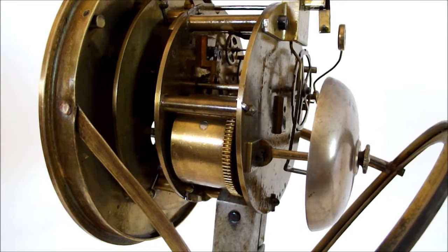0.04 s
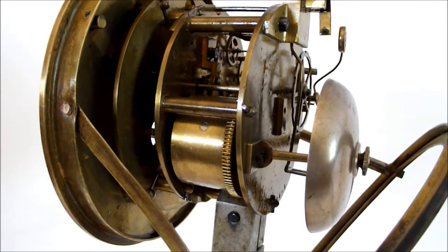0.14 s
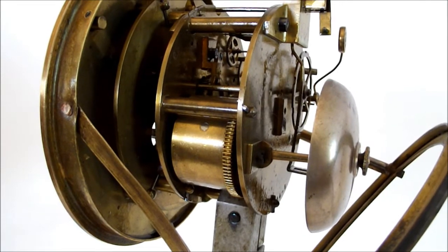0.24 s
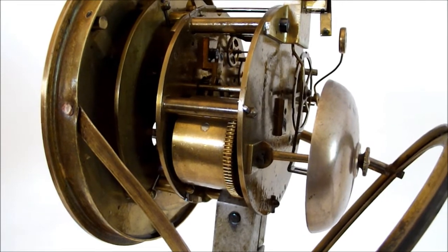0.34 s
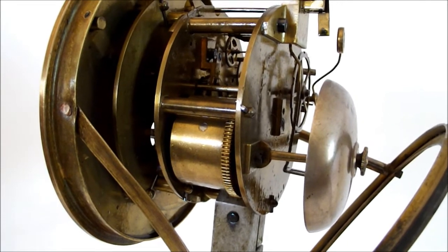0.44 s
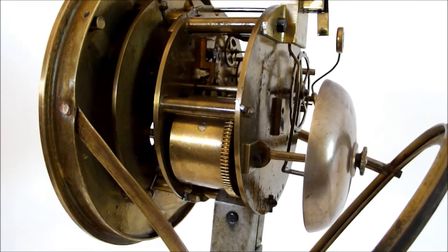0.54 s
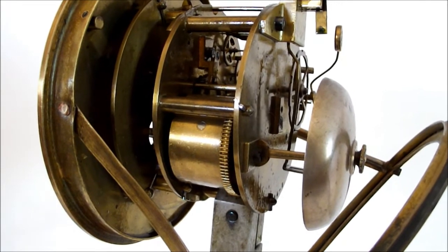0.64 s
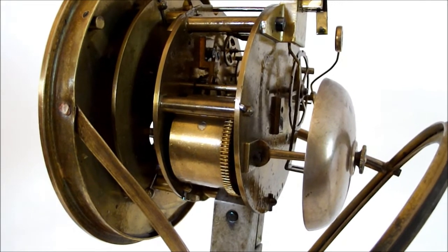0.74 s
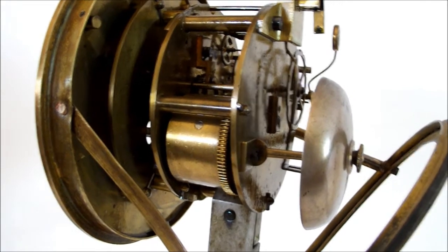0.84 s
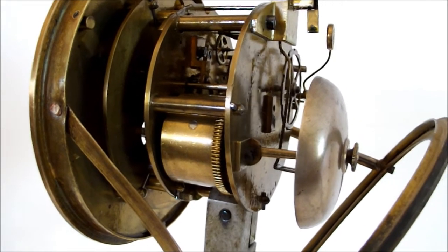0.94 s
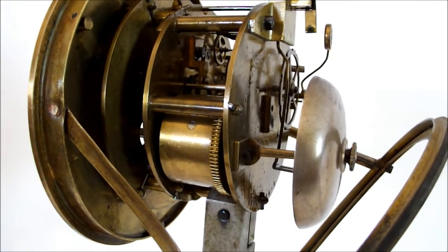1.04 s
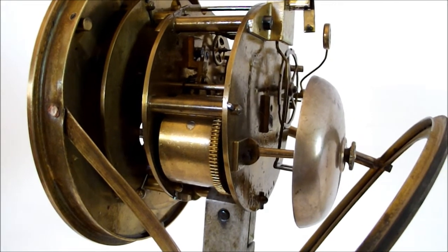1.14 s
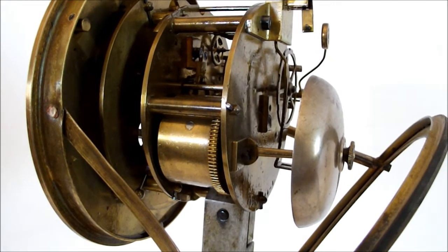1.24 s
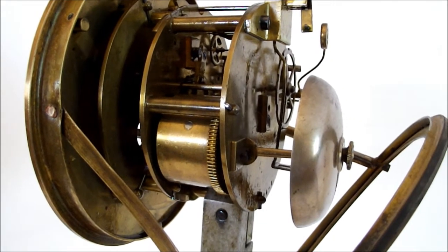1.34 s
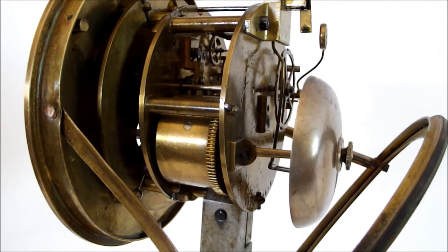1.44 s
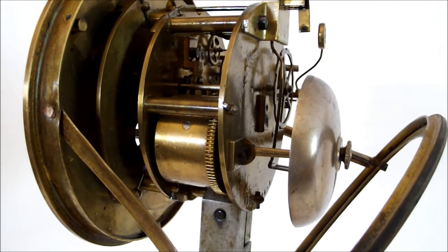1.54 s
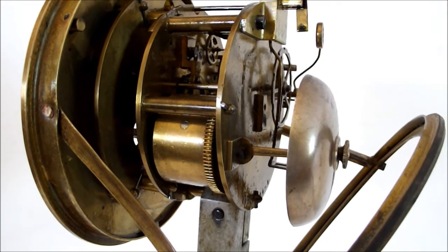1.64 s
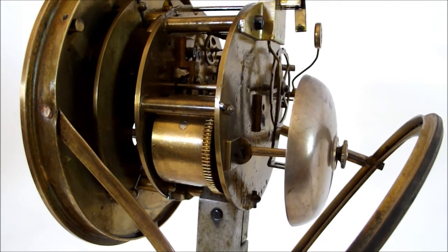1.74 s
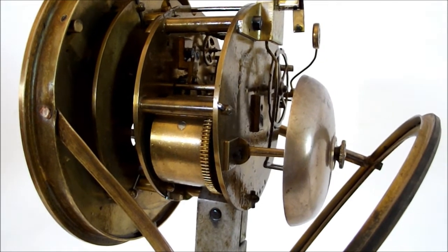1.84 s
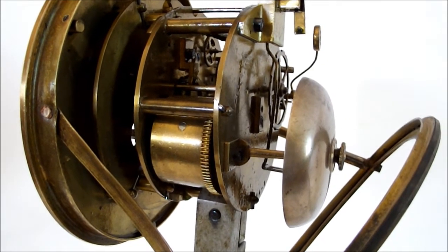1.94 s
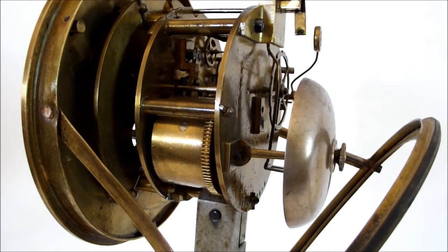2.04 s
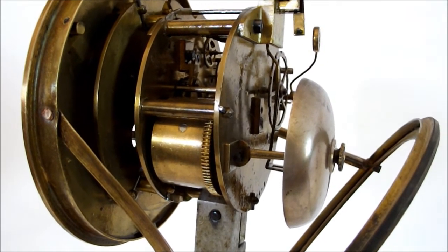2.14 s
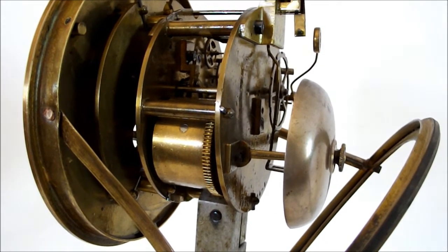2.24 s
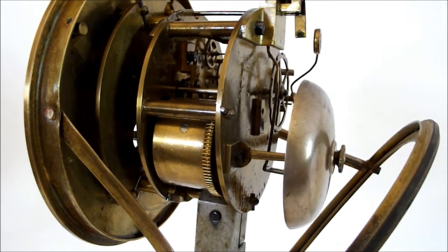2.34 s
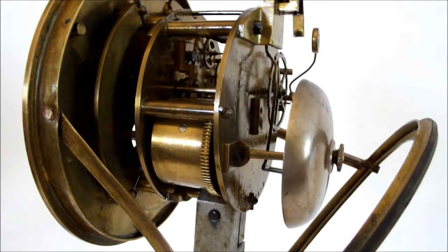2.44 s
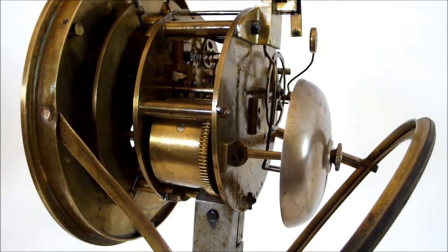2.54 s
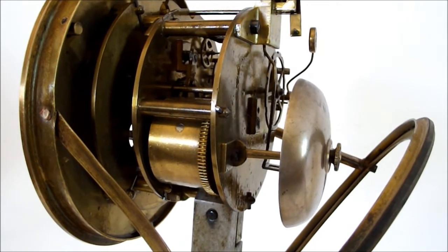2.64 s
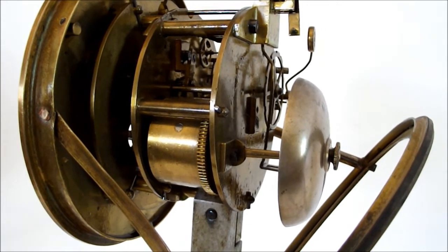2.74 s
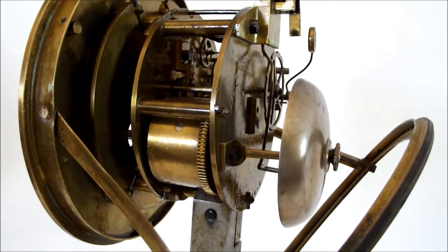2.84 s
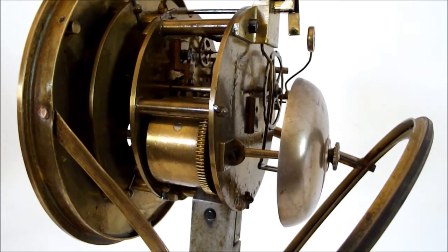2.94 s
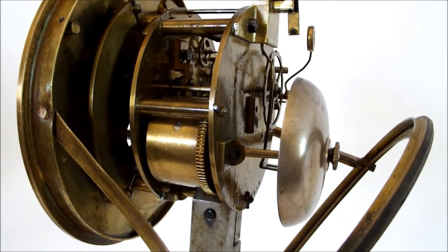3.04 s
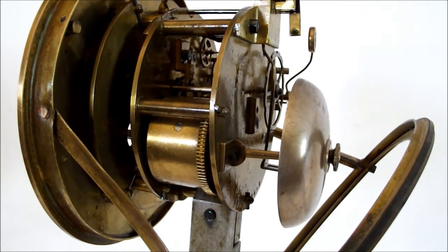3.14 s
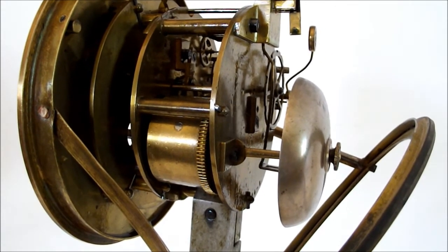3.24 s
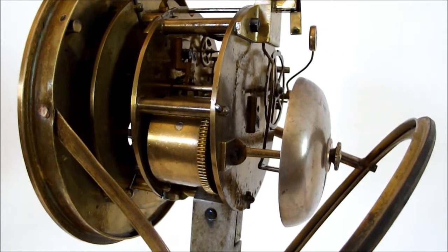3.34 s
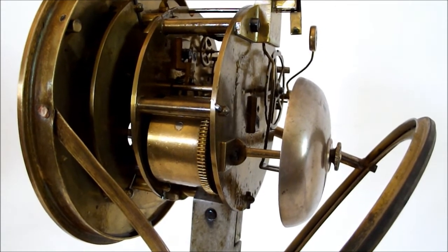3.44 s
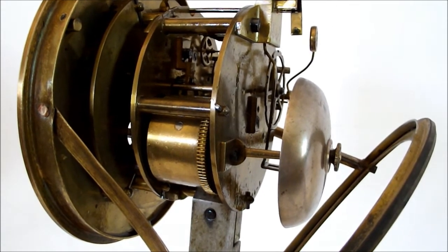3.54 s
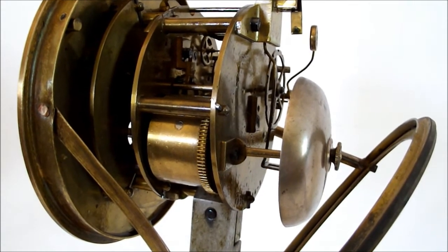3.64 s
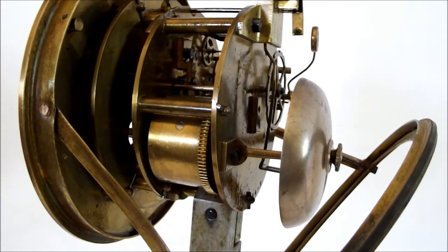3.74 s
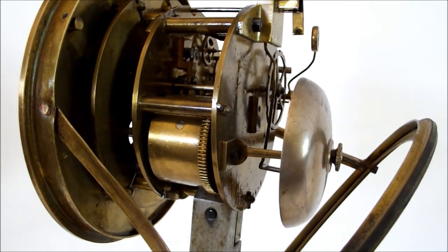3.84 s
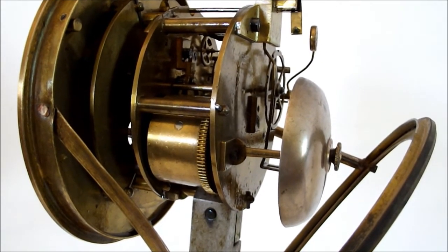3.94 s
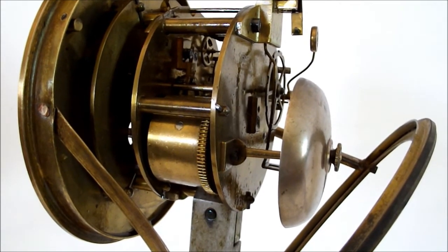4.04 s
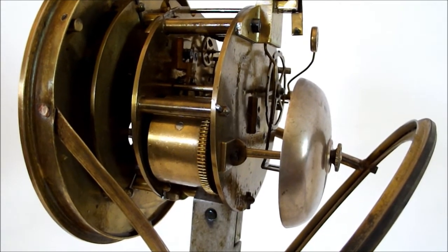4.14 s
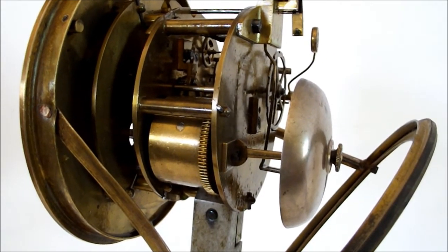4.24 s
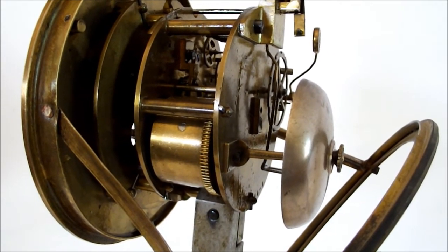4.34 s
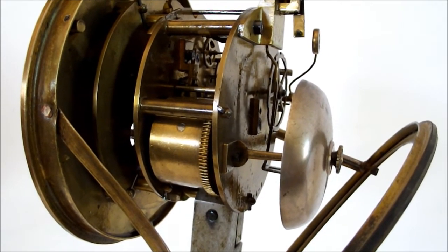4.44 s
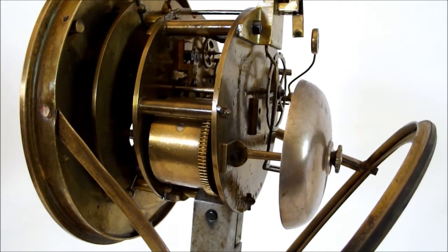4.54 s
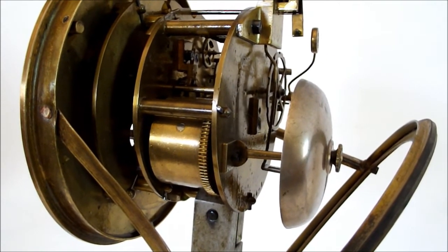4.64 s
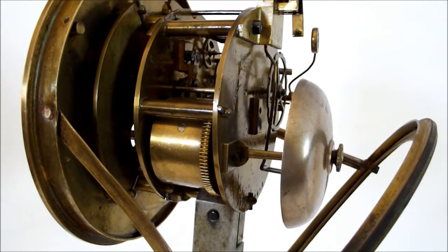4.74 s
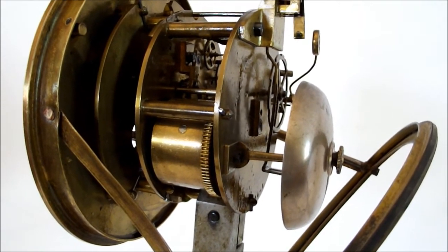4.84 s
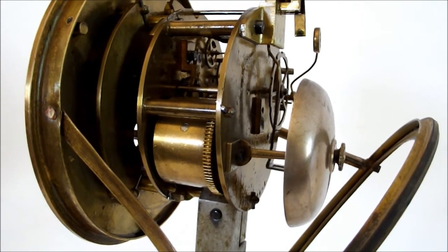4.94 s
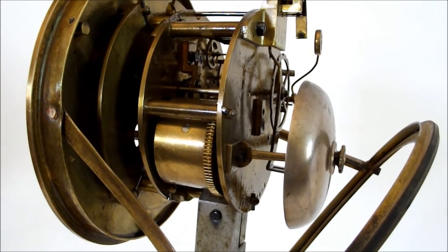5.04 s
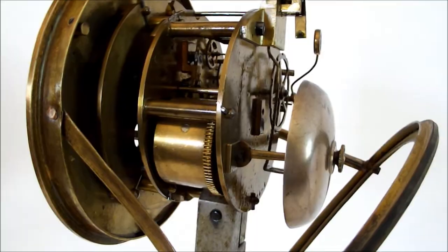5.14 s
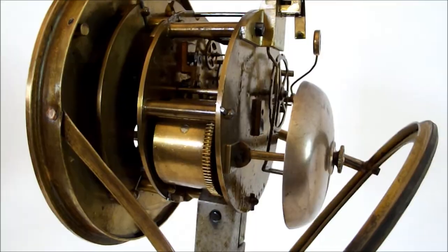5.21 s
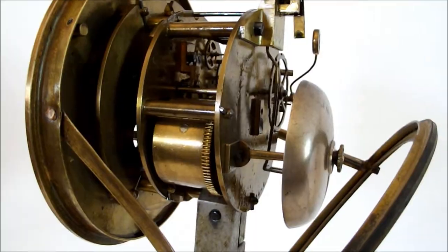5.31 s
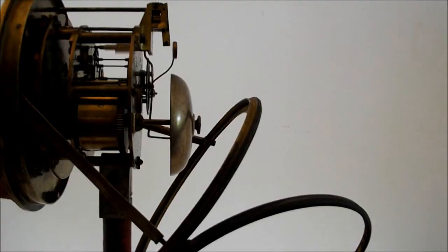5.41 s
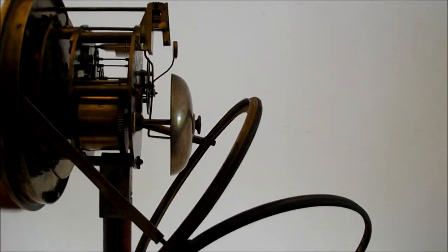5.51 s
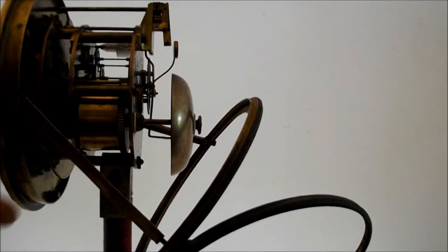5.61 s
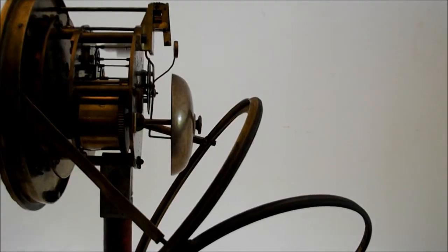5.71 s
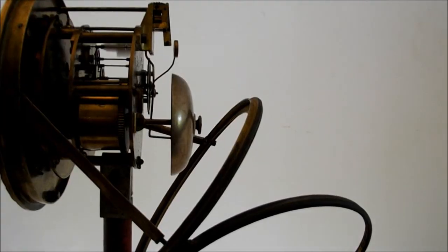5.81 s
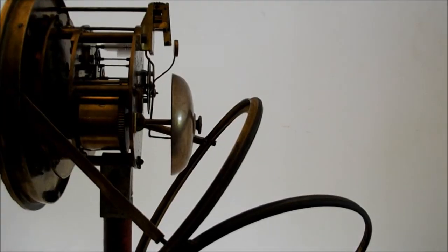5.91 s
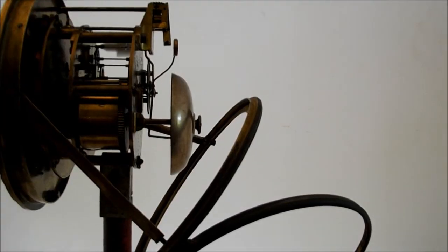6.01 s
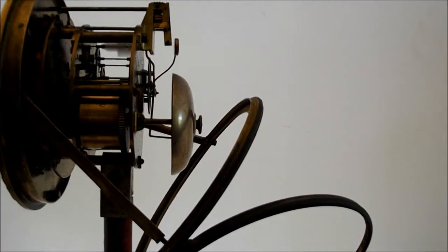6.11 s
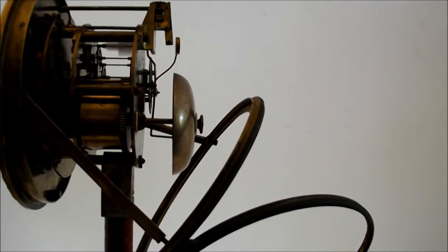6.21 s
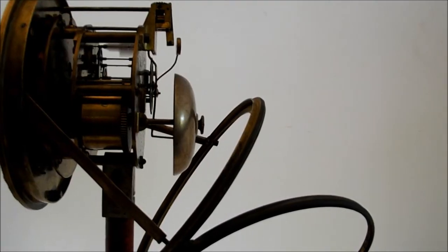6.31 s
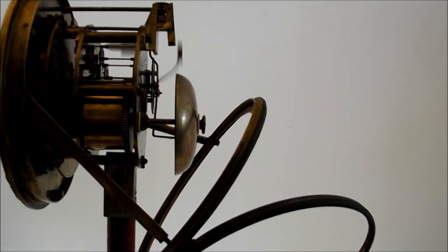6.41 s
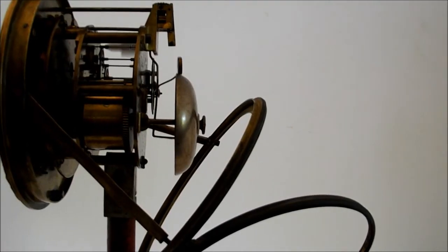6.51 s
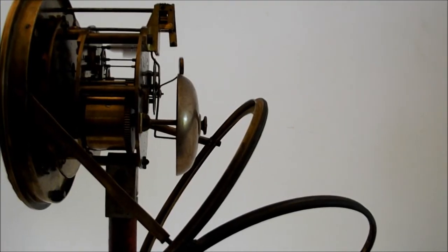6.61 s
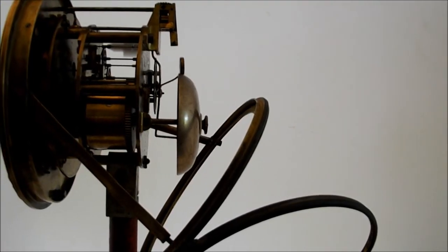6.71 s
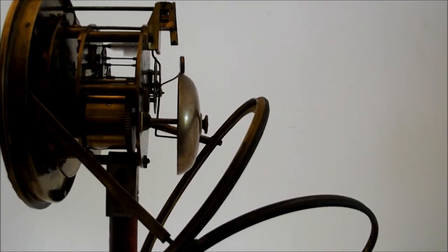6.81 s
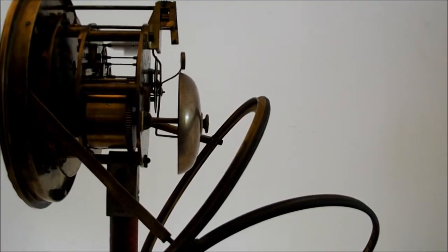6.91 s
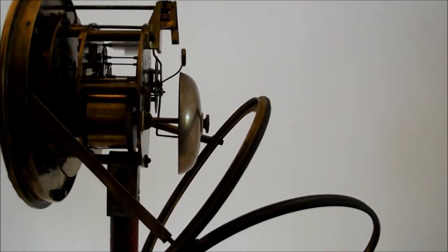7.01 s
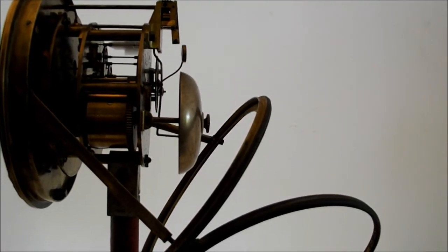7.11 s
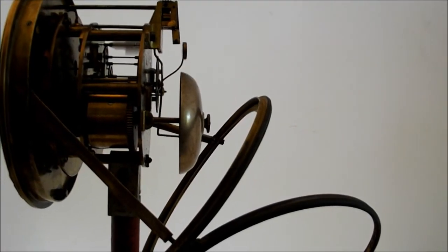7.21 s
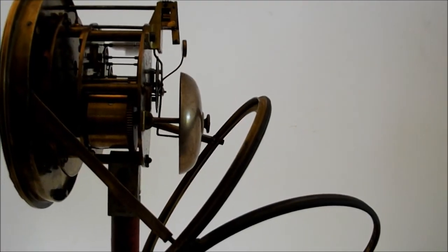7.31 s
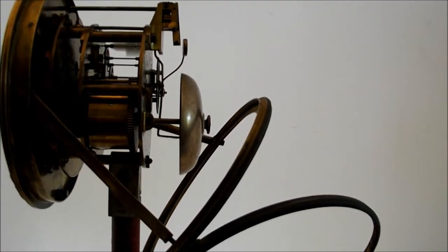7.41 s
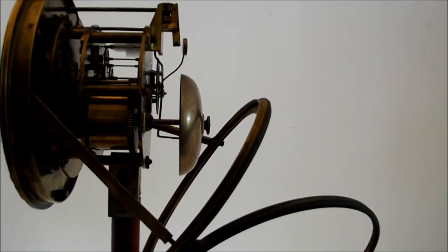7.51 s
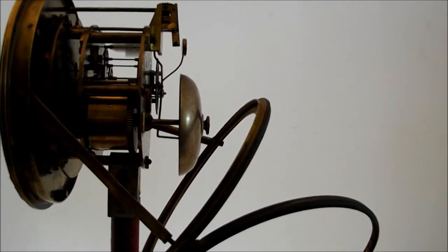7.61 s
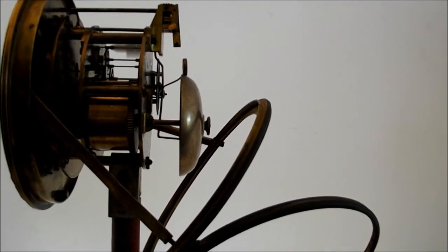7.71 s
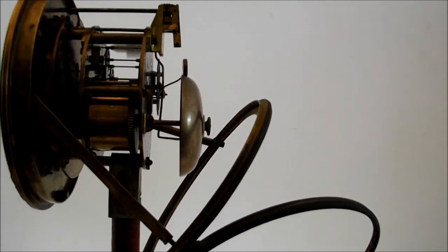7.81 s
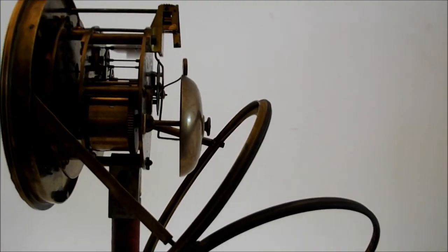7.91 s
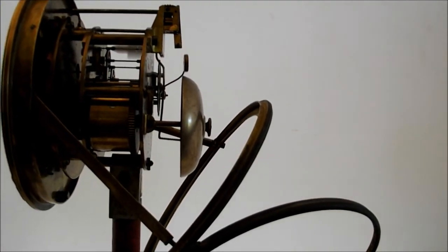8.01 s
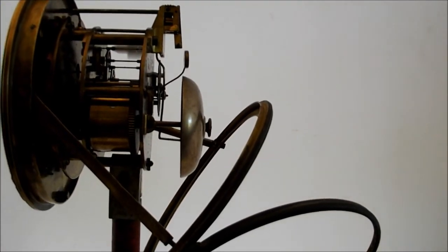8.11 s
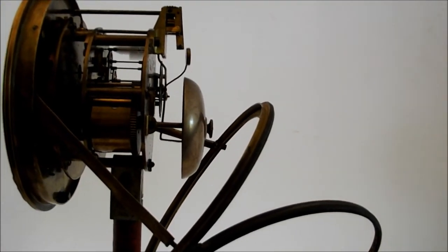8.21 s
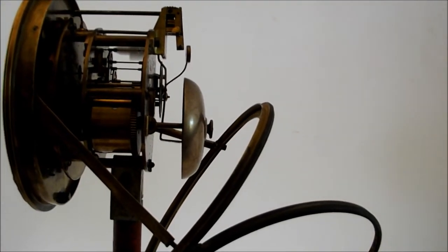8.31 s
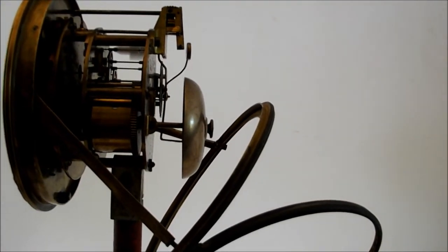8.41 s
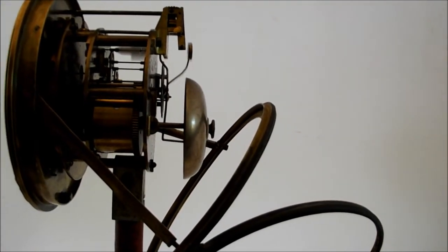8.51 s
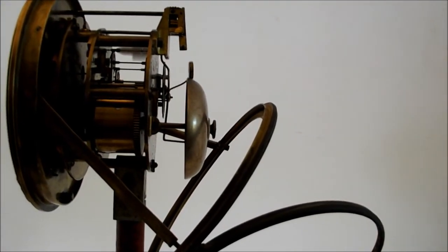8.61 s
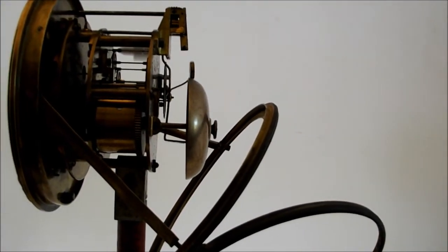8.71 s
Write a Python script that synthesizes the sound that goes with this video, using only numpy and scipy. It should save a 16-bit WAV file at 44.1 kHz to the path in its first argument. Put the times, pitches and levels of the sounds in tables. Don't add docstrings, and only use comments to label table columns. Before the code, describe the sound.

A bare brass clock movement ticks and whirs close up, two wooden knocks among the ticks, then its hammer strikes a bright little bell three times.

```python
import sys
import numpy as np
from scipy import signal
from scipy.fft import rfft, irfft, next_fast_len
from scipy.io import wavfile
from scipy.ndimage import uniform_filter1d, minimum_filter1d

SR = 44100
rng = np.random.default_rng(int(sys.argv[2]) if len(sys.argv) > 2 else 0)


def amplitude_ratio(level_db):
    exponent = np.asarray(level_db, float) / 20
    return 10 ** exponent


def file_out(sig):
    cols = np.atleast_2d(sig).T
    lim = np.clip(cols, -1, 1)
    pcm = np.round(lim * 32767).astype(np.int16)
    wavfile.write(sys.argv[1], SR, pcm)


N = 386306
T = np.arange(N) / SR

# (time [s], level [dB])
TOUCHES = [(6.392499, -10), (6.423977, -22), (6.457216, -21.3), (6.494145, -32.6), (6.529529, -20),
           (6.56739, -17.3), (6.606417, -18.7), (6.639602, -24.2), (7.604261, -10.1), (7.674721, -18.5),
           (7.708237, -19), (8.509644, -10), (8.541736, -23.2), (8.575868, -24.9), (8.610976, -17.5),
           (8.648936, -15.4), (8.68296, -17.5), (8.7583, -24)]
# (frequency [Hz], level [dB])
SNAP = [(1500, -11.5), (2500, -1), (3500, 3), (4800, -9.5), (5500, -27), (7000, -7.5), (9500, -10),
        (12000, -28), (15000, -43.5)]


def evened(x):
    return x / np.sqrt(np.mean(x ** 2) + 1e-20)


def curve(rows, column=1):
    rows = np.asarray(rows)
    return np.interp(T, rows[:, 0], rows[:, column])


def coloured(x, points):
    size = next_fast_len(len(x))
    hz = np.fft.rfftfreq(size, 1 / SR)
    f, db = np.transpose(points)
    gain = amplitude_ratio(np.interp(np.log(hz + 1), np.log(f + 1), db))
    return irfft(rfft(x, size) * gain, size)[:len(x)]


def resonate(x, hz, width):
    r = np.exp(-np.pi * width / SR)
    pole = r * np.exp(2j * np.pi * hz / SR)
    return 2 * signal.lfilter([1 - r], [1, -pole], x).real


def resonant_noise(hz, width):
    noise = rng.standard_normal(N)
    return evened(resonate(resonate(noise, hz, width), hz, width))


def struck(events, modes, spread_db=0, contact_s=1e-4, seconds=0.22):
    out = np.zeros(N + SR)
    t = T[:round(seconds * SR)]
    hz, db, t60 = np.transpose(modes)[:, :, None]
    rise = 1 - np.exp(-t / contact_s)
    for s, peak_db in events:
        chance = spread_db * rng.standard_normal((len(modes), 1))
        decay = amplitude_ratio(db + chance - 60 * t / t60)
        ring = (decay * np.sin(2 * np.pi * hz * t + chance)).sum(0)
        out[round(s * SR):][:len(t)] += amplitude_ratio(peak_db) * rise * ring
    return out[:N]


def burst(events, points, fast_s, slow_s, slow_db, rise_s=0.00036):
    push = np.zeros(N)
    t = T[:4000]
    for s, db in events:
        push[round(s * SR)] = amplitude_ratio(db)
    decay = np.exp(-t / fast_s) + amplitude_ratio(slow_db) * np.exp(-t / slow_s)
    envelope = signal.oaconvolve(push, (1 - np.exp(-t / rise_s)) * decay)[:N]
    return envelope * evened(coloured(rng.standard_normal(N), points))


def bell():
    pair_hz = [1741, 1736, 4214.43, 4182, 7133.3, 7096.65, 10350, 10424.8]
    # (level [dB], t60 [s], share of the moving echo [0-1])
    pair_tones = [(-26.5, 14.7, 0.057), (-39, 17, .02), (-20.5, 14.7, 0.94), (-21, 11.7, .13),
                  (-5, 2.24, 0.018), (-22.5, 2.57, .02), (-8.5, 1.53, .02), (-9.5, 1.39, .25)]
    twin_sign = [1, 1, 1, -1, 1, -1, 1, -1]
    # (time [s], signed gain [ratio])
    sway = [(7.88, 1.33), (7.95, 0.96), (8.02, 1.43), (8.1, 0.89), (8.17, 1.3), (8.24, 0.54), (8.31, .02),
            (8.4, -0.8), (8.5, -1.13)]
    blow_db = -10
    bloom_s = 0.00097

    s, db = np.transpose(TOUCHES)
    at = np.ceil(s * SR).astype(int)
    echo = 1 - curve(sway)
    ring = np.zeros(N)
    for hz, sign, (tone_db, t60, share) in zip(pair_hz, twin_sign, pair_tones):
        pole = 2j * np.pi * hz - np.log(1000) / t60
        kicks = np.zeros(N, complex)
        kicks[at] = amplitude_ratio(db - blow_db) * np.exp(pole * (at / SR - s))
        tone = signal.lfilter([1], [1, -np.exp(pole / SR)], kicks).imag
        tone = resonate(tone, hz, 1 / (np.pi * bloom_s))
        ring += sign * amplitude_ratio(tone_db) * tone * (1 - np.clip(share, 0, 1) * echo)
    return ring


def hammer():
    short_hz = [10910, 13297, 13991, 14048, 7280, 10230, 3300]
    # (level [dB], t60 [s])
    short_tones = [(-10.5, 0.057), (-11.5, 0.12), (-21, 0.62), (-16.5, 0.24), (-13, 0.046), (-7, 0.021),
                   (-18.5, 0.015)]
    # (frequency [Hz], level [dB])
    crack_colour = [(300, -51), (1500, -31), (4200, -14), (5600, -45), (7200, -2.5), (9000, -13),
                    (10600, -2), (12000, -20.5), (16000, -30)]
    # (frequency [Hz], level [dB])
    buzz_colour = [(3000, -28), (4500, -22), (6300, -14.5), (7500, -2), (9000, -3.5), (12000, -7),
                   (15700, -11), (16000, -45)]
    rebound_under_db = -14

    blows = [(s, db) for s, db in TOUCHES if db > rebound_under_db]
    rebounds = [(s, -18.5 + 0.4 * (db + 19.5)) for s, db in TOUCHES if db <= rebound_under_db]
    touches = blows + rebounds
    modes = np.column_stack([short_hz, short_tones])
    tones = struck(touches, modes, spread_db=4.0, contact_s=0.00032, seconds=0.7)
    crack = burst(blows, crack_colour, 0.0018, 0.0055, -17.5, rise_s=0.00026)
    buzz = burst(touches, buzz_colour, 0.00091, 0.045, -13.5)
    return amplitude_ratio(6.5) * tones + amplitude_ratio(2.2) * crack + amplitude_ratio(-7) * buzz


def escapement():
    # (time [s], peak level [dB])
    ticks = [(0.3795, -24.5), (0.845, -24.5), (1.308, -26), (1.7759, -27.5), (2.241, -23.5), (2.7215, -25),
             (3.2026, -22), (3.674, -24.5), (4.1345, -23.5), (4.6014, -21.5), (5.067, -23), (5.3996, -21),
             (5.8633, -27.5), (6.335, -24.5), (6.7975, -28), (7.2551, -26), (7.7084, -29), (8.1658, -22)]
    # (time [s], peak level [dB])
    tocks = [(0.6858, -31), (1.144, -29), (1.6125, -30.5), (2.0917, -30), (2.44, -31), (2.5677, -31),
             (3.049, -35), (3.508, -26.5), (3.9704, -32.5), (4.439, -28.5), (4.896, -28), (5.691, -37),
             (8.4484, -27)]
    # (frequency [Hz], level [dB], t60 [s])
    plate_modes = [(2996, 4, 0.023), (2830, -3, 0.01), (2620, -6.5, 0.049), (3540, -7, 0.012),
                   (1686, -11, 0.027), (4000, -20, .012)]
    # (frequency [Hz], level [dB], t60 [s])
    pallet_modes = [(7070, 6, 0.015), (8260, -8, 0.013), (9200, -3, 0.004), (4390, 9, 0.0035)]
    # (time [s], level [dB])
    clacks = [
        (2.045, -33),
        (2.44, -35.5),
    ]
    # (frequency [Hz], level [dB], t60 [s])
    lever_modes = [(1950, -1, 0.035), (2040, 1, .04), (2270, 0, .02), (1630, -6, .03)]

    beats = [*ticks, *tocks]
    unlock = [(s - 0.002, db - 5.5) for s, db in beats]
    landing = [(s + 0.0008, db - 4.5) for s, db in beats]
    rebound = [(s + 0.016, db - 15.5) for s, db in beats]
    bright = [(s - 0.003, -41 + 0.67 * (db + 26)) for s, db in beats]
    plates = struck(unlock + landing + rebound, plate_modes, spread_db=1.2, contact_s=0.0011)
    pallet = struck(bright, pallet_modes, spread_db=1.5, contact_s=0.001)
    lever = struck(clacks, lever_modes, spread_db=1.5, contact_s=0.00091)
    edge = burst(bright, SNAP, 0.0024, 0.013, -16, rise_s=0.0012)
    return plates + lever + amplitude_ratio(-12.5) * pallet + amplitude_ratio(6.0) * edge


def knocks():
    # (time [s], level [dB], dullness [0-1])
    taps = [(.618, -13, 0.45), (.6215, -18.5, 0.77), (.627, -20, 0.27), (0.633, -24, 0.77),
            (0.636, -21, 0.06), (4.7868, -6.5, 0.25), (4.791, -15.5, 0.86), (4.794, -18, 0.1),
            (4.803, -12.5, 0.42), (4.811, -20, 0.6), (4.82, -27, 1), (4.826, -25, 0.7), (4.835, -26, 0.8),
            (4.846, -23.5, 0.7), (4.853, -23.5, 0.6)]
    # (frequency [Hz], level [dB], t60 [s])
    low_modes = [(127, -11.5, 0.13), (254, -13, 0.092), (376, -8.5, 0.036), (527, -8.5, 0.038),
                 (716, -1.5, 0.039), (813, -2, 0.053), (985, 4.5, 0.027), (1176, -1.5, 0.034),
                 (1360, -11.5, 0.059)]
    # (frequency [Hz], level [dB], t60 [s])
    high_modes = [(1700, -9, 0.013), (1950, -0.5, 0.024), (2670, 1.5, 0.015), (3070, -2, 0.022),
                  (3830, -19, 0.018), (7900, -23, 0.0096)]
    # (time [s], level [dB])
    thuds = [
        (.619, -36),
        (4.788, -38),
    ]
    # (frequency [Hz], level [dB], t60 [s])
    table_modes = [(72, -5, 0.13), (116.6, 1.5, 0.22), (166, -16, .1), (233, 2, 0.16)]
    # (frequency [Hz], level [dB])
    wood_colour = [(47, -47), (80, -12), (135, 0), (612, -17.5), (825, 0.5), (1420, -13), (1970, -28),
                   (2400, -21), (3120, -52), (5280, -120)]

    sharp = [(s, db - 14 * dull) for s, db, dull in taps]
    heavy = [(s, db - 14 * (1 - dull)) for s, db, dull in taps]
    low = struck(heavy, low_modes, spread_db=2.0, contact_s=0.00019)
    high = struck(sharp, high_modes, spread_db=2.5, contact_s=0.00045)
    thud = struck(thuds, table_modes, spread_db=0.5, contact_s=0.0019, seconds=0.4)
    snap = burst(sharp, SNAP, 0.0011, 0.011, -19)
    wood = burst(heavy, wood_colour, 0.0031, 0.015, -8)
    return amplitude_ratio(-5.0) * low + amplitude_ratio(-4.0) * high + thud + amplitude_ratio(-14.0) * snap + amplitude_ratio(-16.5) * wood


def gears(teeth_per_s=1500, spread_db=4.5, flutter_db=1.5):
    # (frequency [Hz], width [Hz], level [dB])
    whir = [(1019.6, 35, -63.5), (1286, 120, -56.5), (1731, 200, -53.5), (2017, 114, -56.5),
            (2738, 140, -48.5), (2986, 63, -58), (3360, 270, -54.5), (3937, 76, -63), (4935, 75, -69.5),
            (8880, 310, -61)]
    out = np.zeros(N)
    size = amplitude_ratio(spread_db * np.minimum(rng.exponential(1, N), 3.5)) * rng.choice([-1, 1], N)
    teeth = evened(size * (rng.random(N) < teeth_per_s / SR))
    for hz, width, db in whir:
        flutter = uniform_filter1d(uniform_filter1d(rng.standard_normal(N), 1500), 1500)
        drive = 0.75 * teeth + 0.63 * rng.standard_normal(N)
        wide = 1.46 * width
        tone = evened(resonate(resonate(drive, hz, wide), hz, wide))
        out += amplitude_ratio(db + flutter_db * evened(flutter)) * tone
    return out


def room():
    # (frequency [Hz], density [dB per Hz])
    air_colour = [(5.9, -31.5), (10, 3), (36, -1.5), (175, -13), (226, -12.5), (340, -12), (428, -12.5),
                  (714, -13.5), (1700, -10), (2380, -11.5), (2700, -2), (4500, -22), (5850, -53.5),
                  (9900, -120)]
    # (frequency [Hz], density [dB per Hz])
    hiss_colour = [(2650, -36.5), (4500, -2), (5000, -8.5), (5330, -7), (5860, -3.5), (8200, -3),
                   (8930, -3.5), (10300, -4), (10800, -11), (15100, -12.5), (15800, -20)]
    # (frequency [Hz], level [dB])
    machines = [(29.3, -61), (225.8, -66), (430.8, -61.5), (511.8, -66), (527.4, -65), (11364, -84)]
    # (time [s], level [dB])
    motor = [
        (5.3, -83),
        (5.42, -59),
        (5.8, -63),
        (7, -67.5),
        (8.4, -62.5),
        (8.55, -77),
    ]
    # (time [s], level [dB])
    slide = [
        (6.08, -70),
        (6.105, -54),
        (6.15, -54),
        (6.22, -66),
        (6.25, -90),
    ]

    air = amplitude_ratio(-48) * evened(coloured(rng.standard_normal(N), air_colour))
    hiss_points = [*hiss_colour, (15950, -60)]
    hiss = amplitude_ratio(-56) * evened(coloured(rng.standard_normal(N), hiss_points))
    hum = sum(amplitude_ratio(db + 2.5) * np.sin(2 * np.pi * (hz * T + rng.random())) for hz, db in machines)
    drone = amplitude_ratio(curve(motor)) * resonant_noise(278, 25)
    scrape = amplitude_ratio(curve(slide)) * resonant_noise(8800, 4000)
    return air + hiss + hum + drone + scrape


def scene():
    return (bell() + hammer() + escapement() + knocks() + gears() + room())[None]


def gain_control():
    overload_s = np.array([6.397, 6.4015, 6.6138, 7.609, 7.6138, 7.7168, 8.5146, 8.5263, 8.6685])
    overload_db = np.array([-3.5, -7, -5.5, -3, -7.5, -7, -4, -7, -5.5])
    recover_db, step_s, glide_s = 1.4, 0.032, 0.00026

    last = np.searchsorted(overload_s, T) - 1
    steps = (T - overload_s[last]) // step_s
    gain_db = np.minimum(overload_db[last] + recover_db * steps, 0)
    gain = amplitude_ratio(gain_db * (last >= 0))
    keep = np.exp(-1 / (glide_s * SR))
    return 1 + signal.lfilter([1 - keep], [1, -keep], gain - 1)


def starved(x, size=24):
    # (frequency [Hz], depth [dB])
    depth = [(4400, 51.5), (6000, 50), (8800, 49.5), (11500, 47.5), (15000, 54)]
    hz, _, z = signal.stft(x, SR, nperseg=2048, noverlap=1536)
    edges = np.arange(0, len(hz), size)
    power = np.add.reduceat(abs(z[0]) ** 2, edges)
    power_db = 10 * np.log10(uniform_filter1d(power, size=3, axis=1) + 1e-20)
    top_db = minimum_filter1d(power_db.max(0), size=9, origin=4)
    luck_db = 6 * uniform_filter1d(rng.standard_normal(power.shape), size=7, axis=1)
    depth_db = np.interp(hz[edges], *np.transpose(depth), left=99)[:, None]
    margin_db = power_db - top_db + depth_db + luck_db
    keep = 1 / (1 + np.exp(-np.clip(margin_db, -40, 40)))
    thinned = z * keep[np.arange(len(hz)) // size]
    return signal.istft(thinned, SR, nperseg=2048, noverlap=1536)[1][:, :N]


def top_cut(x):
    return signal.sosfilt(signal.butter(12, 16660, fs=SR, output="sos"), x)


def record(dry):
    clipped = np.clip(dry * gain_control(), -0.99, 0.99)
    lowpass = signal.butter(16, 16550, fs=SR, output='sos')
    mix = starved(signal.sosfiltfilt(lowpass, clipped))
    return top_cut(mix)


dry = scene()
out = record(dry)
file_out(out)
```